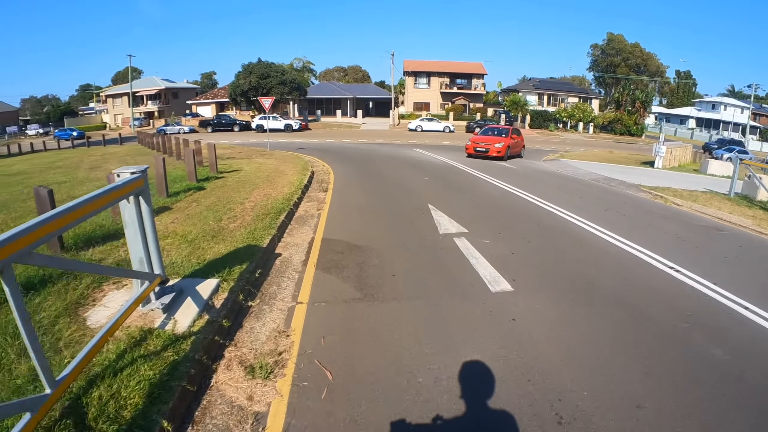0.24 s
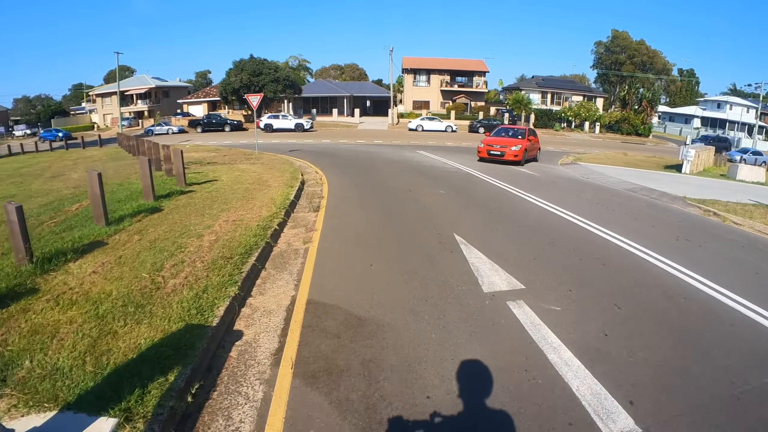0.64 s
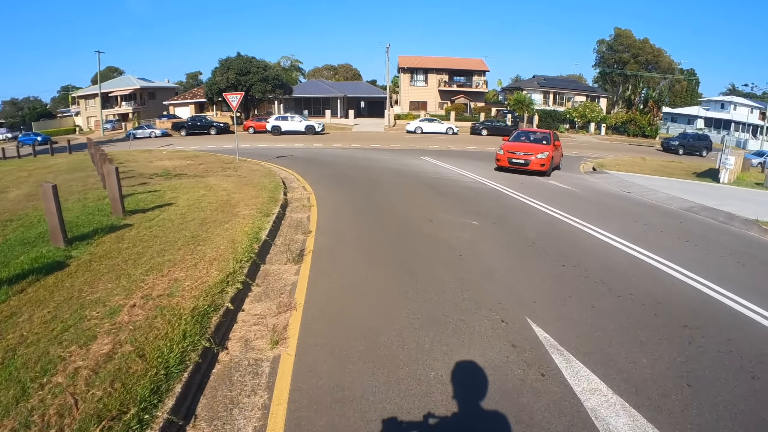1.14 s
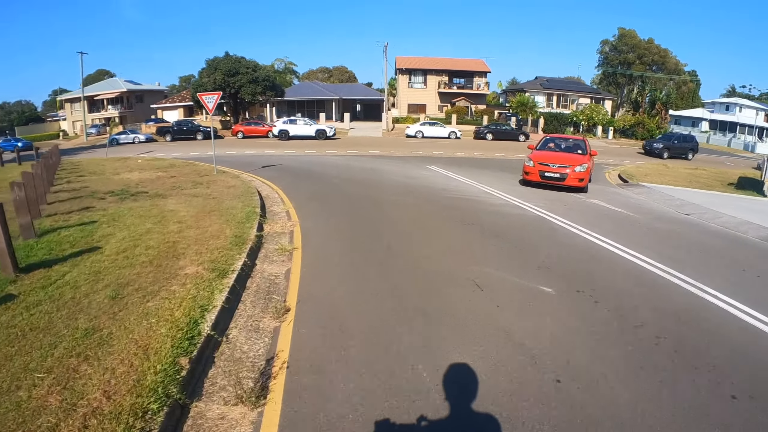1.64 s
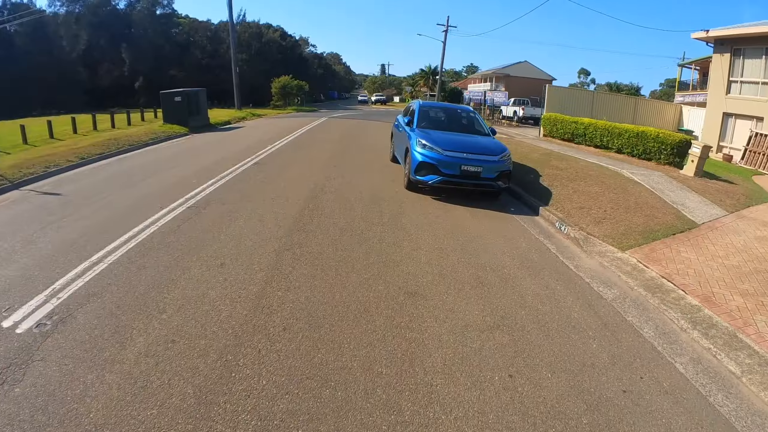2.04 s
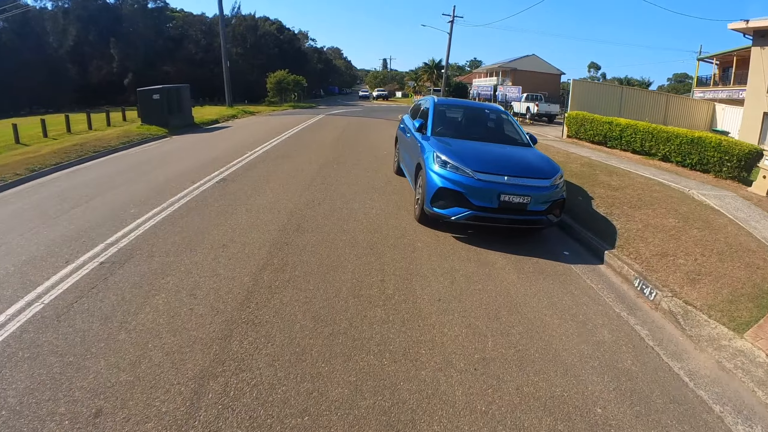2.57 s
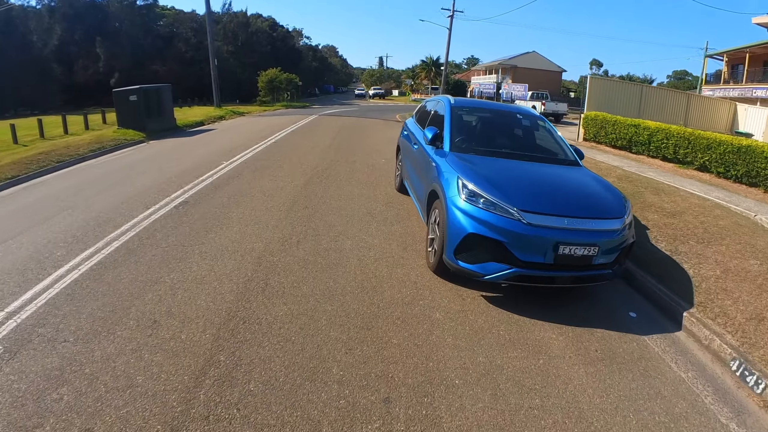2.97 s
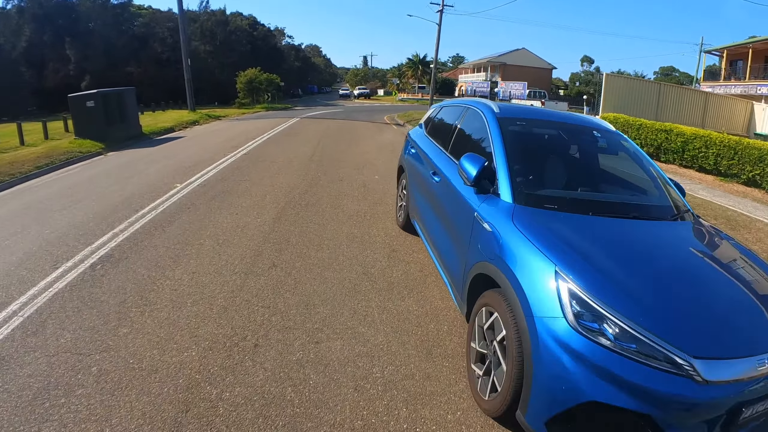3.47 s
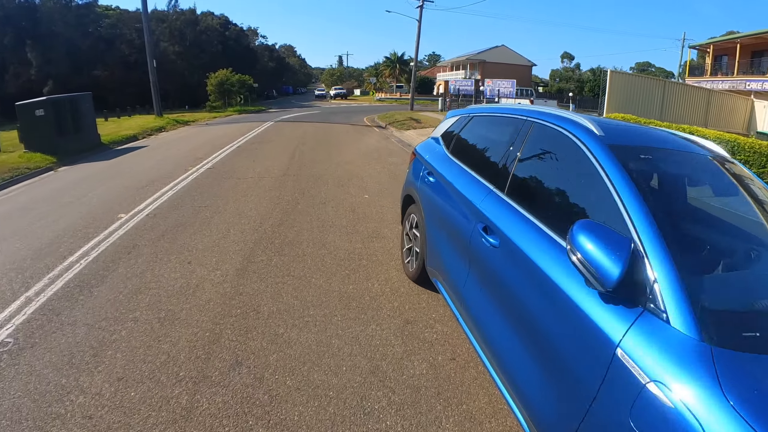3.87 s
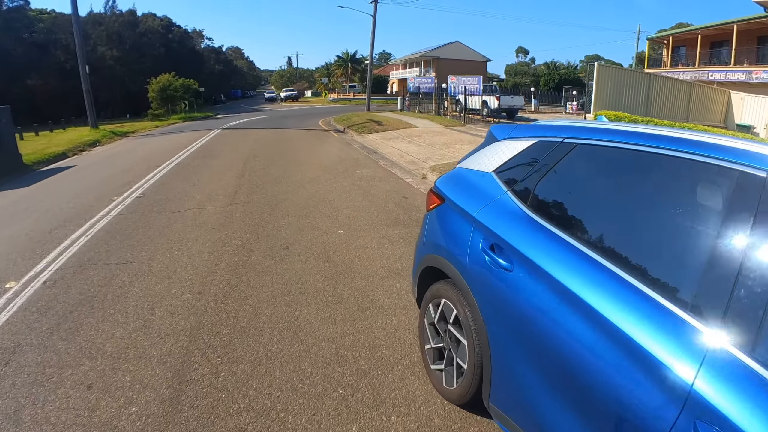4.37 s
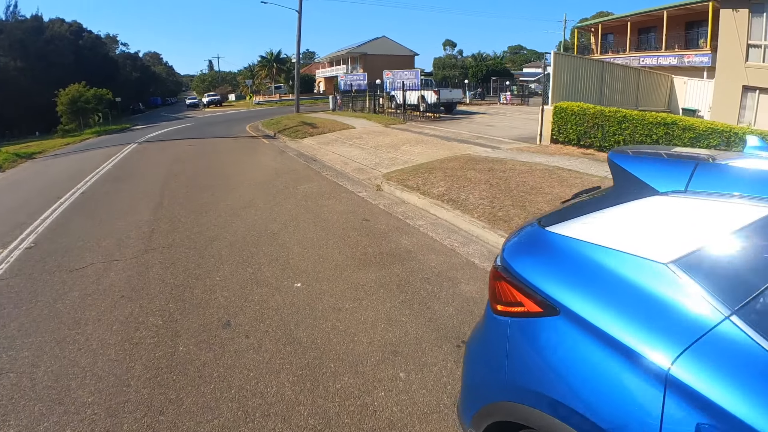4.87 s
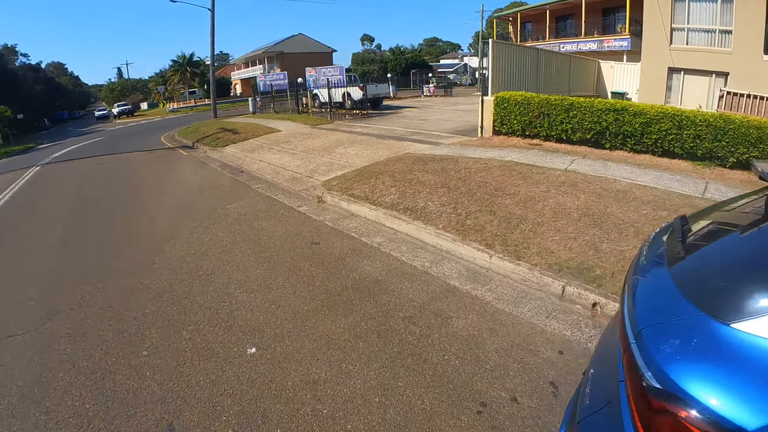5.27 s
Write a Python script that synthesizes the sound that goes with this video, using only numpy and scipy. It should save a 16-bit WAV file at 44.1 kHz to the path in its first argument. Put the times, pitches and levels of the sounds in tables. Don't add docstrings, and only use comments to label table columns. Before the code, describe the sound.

Piercing, pulsing brake squeal from a bicycle comes and goes three times amid wind buffeting, tyre noise and faint freewheel ticking outdoors.

```python
import sys
import numpy as np
from scipy import signal
from scipy.fft import rfft, irfft, next_fast_len
from scipy.io import wavfile
from scipy.ndimage import uniform_filter1d, minimum_filter1d, map_coordinates

SR = 44100
rng = np.random.default_rng(int(sys.argv[2]) if len(sys.argv) > 2 else 0)


def to_wav(sig):
    pcm = np.clip(np.atleast_2d(sig), -1, 1) * 32767
    pcm = np.round(pcm).astype(np.int16)
    wavfile.write(sys.argv[1], SR, pcm.T)


def attenuation_scalar(level_db):
    decades = np.asarray(level_db, float) / 20
    return 10 ** decades


N = 242991
T = np.arange(N) / SR
END_S = 5.3997
SQUEAL_HZ = 1635.5
GRAB_HZ = 3278
BITE_DB = -50

# time_s, squeal_crest_db, throb_depth_db, bite_db, chatter_db
EASING_PULL = [
    (0, -13, 4.5, -52, -77.5),
    (.12, -8, 6.5, -41.5, -65),
    (.21, -11, 6, -46.5, -66.5),
    (.34, -11, 7.5, -46, -74),
    (.49, -23, 7, -61, -70),
    (.6, -18.5, 7.5, -59, -75.5),
    (.81, -19.5, 5.5, -64, -93),
    (.89, -49, 8, -94.5, -100),
    (1.09, -82, 14, -95, -104),
]
GRIPPING_PULL = [
    (1.1, -82, 8, -99, -104),
    (1.24, -58, 8.9, -86, -100),
    (1.35, -38.5, 15, -84.5, -91),
    (1.41, -29, 7.6, -66, -97),
    (1.52, -23.5, 12.5, -55.5, -93),
    (1.65, -18.5, 11.4, -48.5, -82),
    (1.72, -17, 22, -47, -77),
    (1.79, -14.5, 7, -43.5, -78.5),
    (1.9, -13.5, 11.7, -46, -76),
]
STOPPING_PULL = [
    (4.0, -57.5, 6, -78, -90),
    (4.245, -36.5, 16, -81, -81),
    (4.305, -23, 6, -50.5, -81),
    (4.544, -21.5, 27, -52.5, -79),
    (4.6, -17.5, 3, -48.5, -69),
    (4.73, -15, 9.7, -47, -70),
    (4.93, -23.5, 10, -50.5, -69.5),
    (5.15, -27, 7.9, -53, -71.5),
    (5.401, -23, 8.6, -51.5, -67.5),
]
# from_s, to_s
PAD_CONTACT = [
    (0, 1.095),
    (1.095, 1.9005),
    (4.0, 5.45),
]
THROB_DIPS = [
    (-0.0035, 0.0525, 0.00009, 0),
    (1.208, 0.054, 0.00029, 0),
    (4.169, 0.0905, 0.0003, 0.000125),
]
THROB_LEAN = [0.47, -0.11, .2]
# time_s, roughness
CONTACT_ROUGHNESS = [(0, 1.62), (1.9, 1.34), (4.0, 1.2), (5.4, 0.97)]
UPPER_PARTIALS = [-11.5, -22.5, -32.5]
# pitch_hz, width_hz, level_db
SCRAPED_MODES = [(2002, 230, -7.5), (2532, 140, -3), (2940, 96, -10.5), (3300, 240, -2.5), (4830, 640, -15),
                 (9430, 350, -28), (10300, 64, -31.5)]
# pitch_hz, level_db (per Hz)
PAD_COLOUR = [(900, -32), (1800, -6), (3500, -29.5), (5600, -34), (7000, -34), (10000, -39.5),
              (12800, -60.5), (13300, -84.5), (16000, -100)]
# pitch_hz, level_db (per Hz)
HISS_COLOUR = [(1500, -14.5), (3000, 2.5), (5000, -10), (8000, -15.5), (11000, -20), (12600, -29.5),
               (13400, -45.5), (14600, -60), (15500, -91)]
# pitch_hz, width_hz, level_db
HISSING_MODES = [(6310, 290, 3), (12500, 350, 0), (1637, 110, 0)]
# time_s, level_db
TOP_MODE_LEVEL = [(0, -32.5), (.8, -24.5), (1.4, -12), (4.0, -15.5), (5.4, -13)]
# time_s, wind_db, nearness_db
RIDE_PAST = [(0, -40, 4.5), (.39, -45.5, 18), (.63, -41.5, 7.5), (.9, -36.5, 1.5), (1.25, -44.5, 5.5),
             (1.5, -39, -0.5), (1.88, -49, 9), (1.92, -45.5, 11), (2.1, -44.5, 4.5), (2.45, -44.5, 4),
             (2.7, -50, 3), (3.3, -50.5, 2.5), (3.75, -48.5, 12), (4.2, -48.5, 15), (4.8, -43.5, 27.5),
             (5.08, -48, 23.5), (5.16, -42.5, 21.5), (5.4, -48, 22)]
# pitch_hz, level_db (per Hz)
WIND_COLOUR = [(20, -56.5), (35, -40), (55, -0.5), (100, 1), (170, -5.5), (260, -12), (450, -26),
               (900, -74)]
# pitch_hz, level_db (per Hz)
STREET_COLOUR = [(60, -39.5), (150, 0), (280, -5), (400, -0.5), (650, -3.5), (1050, -5), (1500, -11),
                 (2600, -22.5), (3100, -36), (5000, -40), (12400, -54), (13200, -64), (16000, -72)]
# time_s, ticks_per_s, level_db
PAWL_TICKS = [
    (0, 45, -73.5),
    (1.9, 30, -78.5),
    (1.91, 44, -73.5),
    (3.5, 42, -79),
    (3.95, 47, -66),
    (4.2, 36, -80),
    (5.4, 25, -83),
]
# pitch_hz, width_hz, level_db
HUB_MODES = [(6000, 300, -11.5), (10050, 330, 4.5)]
# peak_s, level_db, width_s
PAD_GRABS = [
    (.04, -44, .015),
    (.105, -43, .02),
    (.6, -46, .015),
    (1.79, -42.5, .025),
    (4.35, -49, 0.028),
    (4.555, -40, 0.049),
    (4.745, -31, 0.026),
    (5.28, -42, 0.034),
]
# peak_s, level_db, width_s
CHIRP_EVENTS = [(.048, -59, 0.018), (.111, -51, 0.013), (.151, -51, .017), (.176, -49.5, 0.011),
                (.257, -56.5, 0.011), (.416, -58.5, .015), (.453, -52.5, 0.0094), (.536, -56, 0.0075),
                (.567, -56.5, 0.013), (1.79, -53, .01), (1.878, -57, .016), (4.604, -46.5, 0.015),
                (4.675, -41.5, 0.015), (4.746, -48, 0.0094), (4.914, -53, 0.018), (4.992, -38, 0.016),
                (5.021, -46.5, 0.014), (5.172, -40.5, 0.0097), (5.2, -51, 0.013), (5.262, -29.5, 0.019),
                (5.31, -51, .012), (5.367, -33, 0.017)]
# peak_s, level_db, width_s
EDDY_EVENTS = [(.078, -29, 0.0048), (.121, -22, 0.011), (.616, -33, 0.046), (.666, -28.5, 0.032),
               (.715, -19, 0.0092), (.73, -12.5, 0.0064), (.801, -20, 0.0091), (.855, -10, 0.0075),
               (.879, -15.5, 0.0064), (.93, -33, 0.0083), (1.059, -23.5, 0.0081), (1.078, -22.5, 0.0099),
               (1.24, -33, 0.035), (1.406, -29.5, 0.0084), (1.461, -28, 0.0069), (1.496, -23, 0.029),
               (1.541, -26, 0.0089), (1.564, -30, 0.062), (1.607, -25.5, 0.027), (1.907, -28, 0.02),
               (2.031, -29.5, 0.018), (2.117, -20.5, .0055), (2.13, -30, 0.0067), (2.152, -22, 0.016),
               (2.165, -29, 0.011), (2.233, -29.5, .019), (2.331, -32, 0.028), (2.377, -28.5, 0.02),
               (2.6, -27.5, 0.013), (3.558, -33, .017)]
# peak_s, level_db, width_s
THIRD_FLARES = [
    (.27, -46.5, .025),
    (.33, -55, 0.023),
    (.75, -64.5, .04),
    (.815, -65, .02),
    (4.545, -50, 0.026),
    (4.75, -52, .03),
    (4.96, -47, 0.063),
]
# peak_s, level_db, width_s
EDDY_EDGES = [
    (.703, -32.5, 0.0057),
    (.721, -32.5, 0.0063),
    (.787, -23.5, 0.0019),
    (.8, -32.5, 0.0026),
    (.852, -25.5, 0.0028),
    (.866, -19, 0.0018),
    (.887, -31, 0.015),
    (2.12, -52, 0.0056),
    (2.6, -41, .0055),
]
# peak_s, level_db, width_s
PIP_EVENTS = [(1.517, -75, .014), (1.56, -77.5, 0.01), (1.6, -81.5, .012), (1.69, -83, .013),
              (1.731, -80, 0.015), (1.827, -69.5, .016), (1.874, -66.5, .015), (4.68, -69, .009),
              (4.719, -63.5, 0.013), (4.893, -66, 0.02), (5.065, -52.5, .013), (5.156, -32.5, 0.0076),
              (5.172, -46, 0.007), (5.253, -32.5, 0.012), (5.288, -48, .012), (5.359, -32.5, .018),
              (5.374, -48.5, .007)]
# time_s, pitch_hz, level_db
TYRE_DRONE = [
    (2.1, 383.3, -84),
    (2.4, 385.4, -56.5),
    (3.4, 381.8, -59),
    (3.7, 270.9, -55),
    (4.2, 256.6, -53.5),
    (4.35, 292.6, -45),
    (4.8, 281.1, -46.5),
    (5.0, 252.3, -44),
    (5.4, 249.7, -51),
]
# peak_s, level_db, pitch_hz, width_s
FRAME_CREAK = [
    (2.3, -67, 3380, 0.017),
    (2.303, -65, 2960, 0.015),
    (2.305, -60, 2070, 0.031),
]


def unit(x):
    return x / np.sqrt(np.mean(x ** 2) + 1e-20)


def curves(tables):
    s, *columns = np.transpose(np.concatenate(tables))
    return [np.interp(T, s, column) for column in columns]


def wobble(rate):
    return map_coordinates(rng.standard_normal(int(N * rate / SR) + 4), [T * rate])


def shaped(gain, patchy_db):
    spectrum = signal.stft(rng.standard_normal(N + 512), nperseg=512)[2]
    patches = uniform_filter1d(rng.standard_normal(spectrum.shape), size=5, axis=0)
    patches = unit(uniform_filter1d(patches, size=10, axis=1))
    noise = signal.istft(spectrum * attenuation_scalar(patchy_db * patches), nperseg=512)[1][:N]
    m = next_fast_len(N)
    return unit(irfft(rfft(noise, m) * gain(np.fft.rfftfreq(m, 1 / SR) + 1), m)[:N])


def colour(points):
    hz, db = np.transpose(points)
    return lambda f: attenuation_scalar(np.interp(np.log(f), np.log(hz), db))


def modes(rows):
    def gain(f):
        return sum(attenuation_scalar(db) * (f * w) ** 2 / ((c * c - f * f) ** 2 + (f * w) ** 2) for c, w, db in rows)
    return gain


def pitched(rows, hz):
    s, db, width = np.transpose(rows)
    return np.transpose([s, db, hz(s, width), width])


def bursts(rows, tail, drift):
    out = np.zeros(N + SR)
    t = np.arange(-SR // 8, SR // 8) / SR
    for (s, db, hz, width), turn in zip(rows, rng.random(len(rows))):
        u = t / width
        rise = np.exp(-2.8 * u * u)
        fall = np.exp(-2.8 * u * u / (1 + tail * np.abs(u)))
        wave = np.cos(2 * np.pi * (hz * (t - drift * t * np.abs(u)) + turn))
        out[round(s * SR) + SR // 4:][:len(t)] += attenuation_scalar(db) * np.where(u < 0, rise, fall) * wave
    return out[SR // 4 + SR // 8:][:N]


def lever():
    return curves([EASING_PULL, GRIPPING_PULL, STOPPING_PULL])


def pad_on():
    return uniform_filter1d(sum(1. * (T >= on) * (T < off) for on, off in PAD_CONTACT), size=9)


def disc_angle():
    k = np.arange(-3, 22)
    leaning = []
    for (s, gap, slow, slower), lean in zip(THROB_DIPS, THROB_LEAN):
        dips_s = s + k * gap + k ** 2 * slow + k ** 3 * slower
        angle = 2 * np.pi * np.interp(T, dips_s, k + .5)
        leaning.append(angle + lean * (1 + np.cos(angle)))
    return np.choose(np.searchsorted([on for on, off in PAD_CONTACT[1:]], T), leaning)


def throbbing():
    crest_db, depth_db = lever()[:2]
    high, low = attenuation_scalar(crest_db), attenuation_scalar(crest_db - np.abs(depth_db))
    return pad_on() * ((high + low) / 2 + (high - low) / 2 * np.exp(1j * disc_angle()))


def squeal_phase():
    phase = 2 * np.pi * np.cumsum(SQUEAL_HZ + 1.4 * wobble(70)) / SR
    end = round(END_S * SR)
    return phase - phase[end] - np.angle(throbbing()[end]) + np.pi / 2


def squeal(phase):
    return attenuation_scalar(0.4 * wobble(110) + .5 * wobble(18)) * np.imag(throbbing() * np.exp(1j * phase))


def partials(phase):
    crest_db, _, bite_db, _ = lever()
    swell_db = -2 * np.cos(disc_angle() - 0.56)
    fade_db = .6 * np.minimum(crest_db + 30, 0)
    second_db = bite_db + swell_db + fade_db
    third_db = -61 + 1.3 * (bite_db - BITE_DB) + swell_db / 2 + 2 * fade_db
    rough = curves([CONTACT_ROUGHNESS])[0]

    def partial(order, db):
        flicker_db = 3 * wobble(35) + 3.4 * rough * wobble(120)
        slip = .26 * order * rough * wobble(110)
        return attenuation_scalar(db + flicker_db) * np.sin(order * phase + slip)

    out = partial(2, second_db - 2.36) + partial(3, third_db)
    for order, db in enumerate(UPPER_PARTIALS, start=4):
        out += partial(order, third_db + db)
    return out


def scrape():
    scrape_db = -70 + 0.4 * (lever()[2] - BITE_DB)
    broad, rung = colour(PAD_COLOUR), modes(SCRAPED_MODES)
    rub = attenuation_scalar(scrape_db + 14.5 + 0.96 * wobble(25)) * shaped(lambda f: broad(f) + rung(f), patchy_db=2.5)
    hiss = attenuation_scalar(scrape_db - 9 + 1.4 * wobble(28)) * shaped(colour(HISS_COLOUR), patchy_db=4.0)
    return rub + hiss


def high_disc_hiss():
    low_db = lever()[3]
    top_db = low_db + curves([TOP_MODE_LEVEL])[0]
    low = attenuation_scalar(low_db + 4.5 + 2.7 * wobble(30)) * shaped(modes(HISSING_MODES[:1]), patchy_db=0.5)
    top = attenuation_scalar(top_db + 2.5 + 5 * wobble(35)) * shaped(modes(HISSING_MODES[1:2]), patchy_db=2.3)
    return low + top


def wind_rumble():
    lumps = attenuation_scalar(2.5 * wobble(30) + 1.1 * wobble(8.2))
    return attenuation_scalar(curves([RIDE_PAST])[0] + 2.5) * unit(lumps * shaped(colour(WIND_COLOUR), patchy_db=-0.77))


def street():
    near_db = curves([RIDE_PAST])[1]
    body_db = -54.5 + .3 * near_db - 2.5 * (T < 2.1)
    body_db = body_db + 2.0 + 1.1 * wobble(5.3) + 0.27 * wobble(3.0)
    body = attenuation_scalar(body_db) * shaped(colour(STREET_COLOUR), patchy_db=1.5)
    hiss = attenuation_scalar(-85 + near_db + 1.4 * wobble(40)) * shaped(colour(HISS_COLOUR), patchy_db=2.0)
    return body + hiss


def disc_hum():
    return attenuation_scalar(-67.0) * shaped(modes(HISSING_MODES[2:]), patchy_db=-0.3)


def freewheel():
    rate, tick_db = curves([PAWL_TICKS])
    clicks = np.diff(np.floor(np.cumsum(rate) / SR), prepend=0)
    ticks = clicks * attenuation_scalar(tick_db + 24.5 + 3 * wobble(40))
    return irfft(rfft(ticks) * modes(HUB_MODES)(np.fft.rfftfreq(N, 1 / SR) + 1), N)


def pad_grabs():
    rows = pitched(PAD_GRABS, lambda s, width: GRAB_HZ + 0 * s)
    return attenuation_scalar(1.5 * wobble(67)) * bursts(rows, tail=0.44, drift=0)


def chirps():
    rows = pitched(CHIRP_EVENTS, lambda s, width: 6272 + 22 * rng.standard_normal(len(s)))
    return attenuation_scalar(1.4 + 1.6 * wobble(160)) * bursts(rows, tail=.8, drift=.0003)


def wind_eddies():
    rows = pitched(EDDY_EVENTS, lambda s, width: 91.2 + 0.45 / width)
    return attenuation_scalar(-1.9) * bursts(rows, tail=0.088, drift=0.059)


def third_flares():
    rows = pitched(THIRD_FLARES, lambda s, width: 1.5 * GRAB_HZ - 8 + 0 * s)
    return attenuation_scalar(2.5 * wobble(90)) * bursts(rows, tail=.8, drift=0)


def eddy_edges():
    rows = pitched(EDDY_EDGES, lambda s, width: 360 + 0.12 / width)
    return attenuation_scalar(1.5) * bursts(rows, tail=1.0, drift=0.29)


def pips(phase):
    rows = pitched(PIP_EVENTS, lambda s, width: 12560 - 34 * s + 25 * rng.standard_normal(len(s)))
    out = attenuation_scalar(1.5 + 2.2 * wobble(220)) * bursts(rows, tail=.7, drift=.0006)
    return out * (1 + .04 * wobble(260) * np.sin(phase) + .012 * wobble(260) * np.sin(2 * phase))


def tyre_drone():
    hz, db = curves([TYRE_DRONE])
    phase = 2 * np.pi * np.cumsum(hz + 12 * wobble(6)) / SR
    return attenuation_scalar(db) * (wobble(75) * np.sin(phase) + wobble(75) * np.cos(phase))


def frame_creak():
    return attenuation_scalar(4.8 * wobble(200) - 3.5) * bursts(FRAME_CREAK, tail=.4, drift=0.0087)


def scene():
    phase = squeal_phase()
    under_pad = partials(phase) + scrape() + high_disc_hiss() + pad_grabs() + third_flares()
    brake = squeal(phase) + pad_on() * under_pad + chirps() + pips(phase)
    wind = wind_rumble() + wind_eddies() + eddy_edges()
    wheels = disc_hum() + freewheel() + tyre_drone()
    return (brake + wind + street() + wheels + frame_creak())[None]


def top_cut(x):
    return signal.sosfilt(signal.butter(12, 15540, fs=SR, output="sos"), x)


def record(dry):
    heard = signal.sosfilt(signal.butter(4, 42, "high", fs=SR, output="sos"), dry)
    gain = minimum_filter1d(np.minimum(1, .283 / (np.abs(heard) + 1e-9)), size=400)
    return top_cut(heard * uniform_filter1d(gain, size=200) * (T < END_S))


dry = scene()
out = record(dry)
to_wav(out)
```